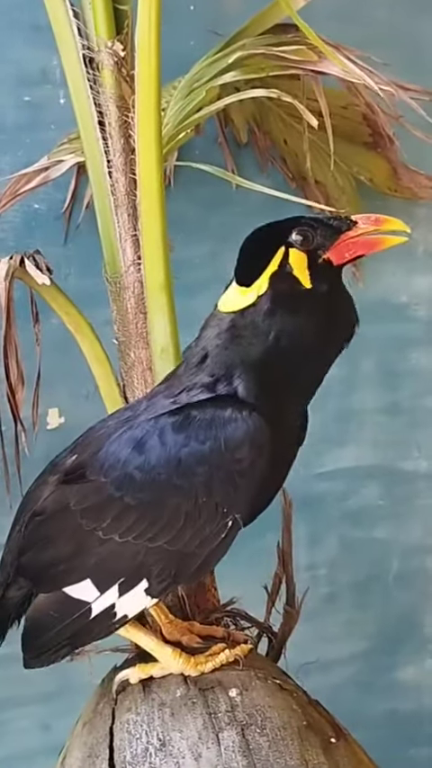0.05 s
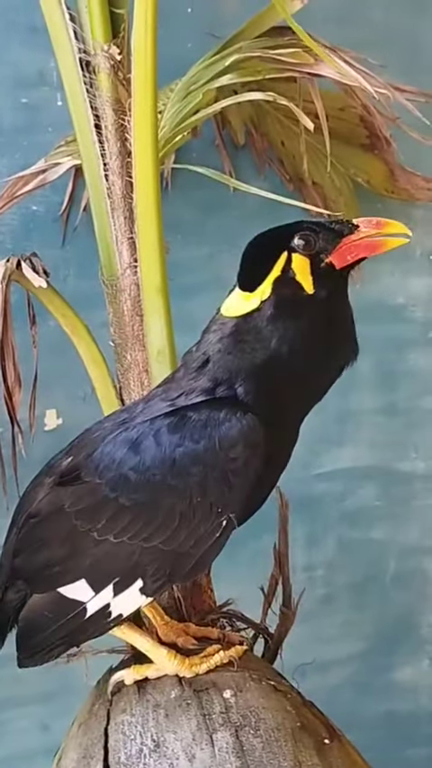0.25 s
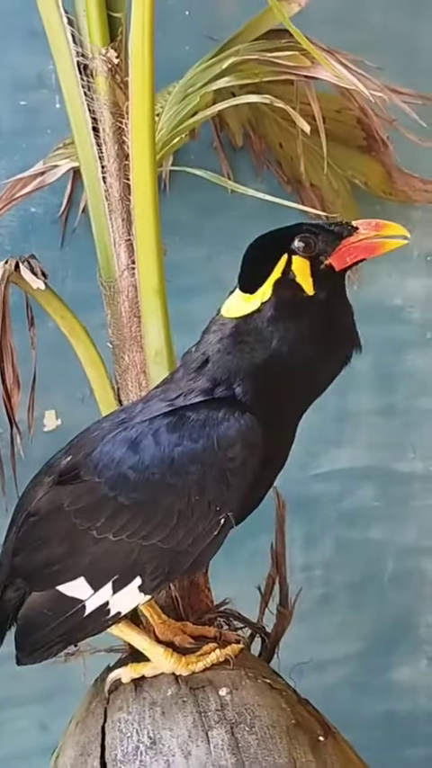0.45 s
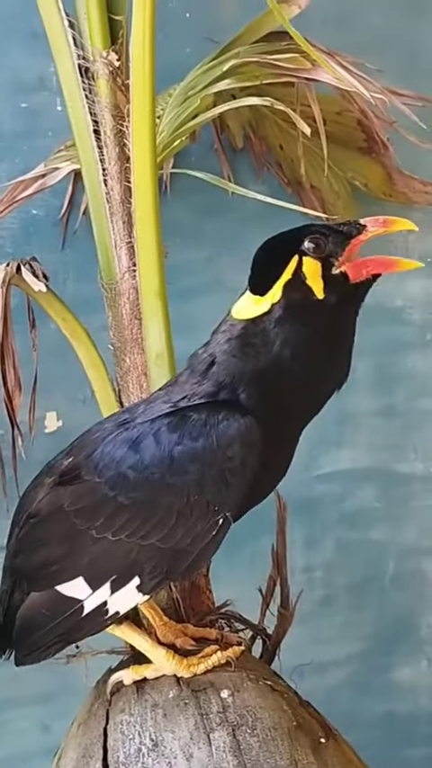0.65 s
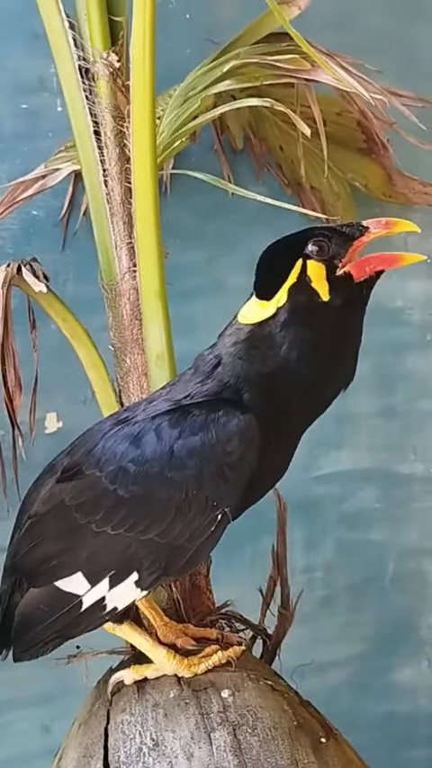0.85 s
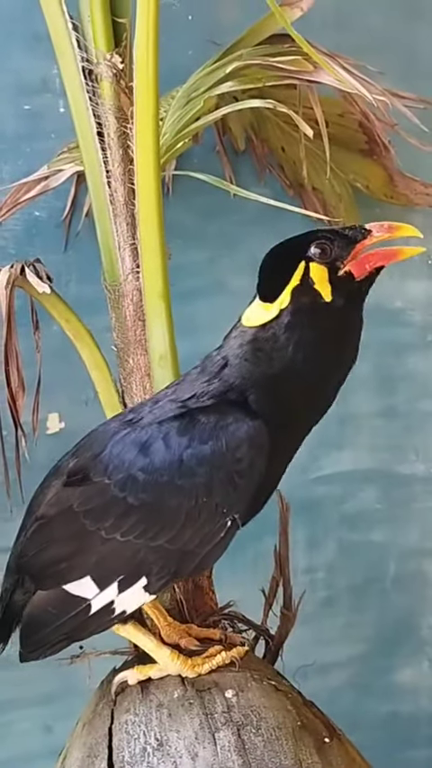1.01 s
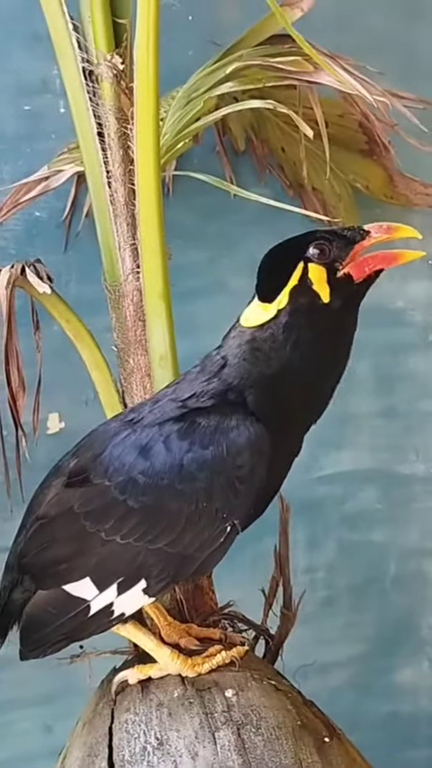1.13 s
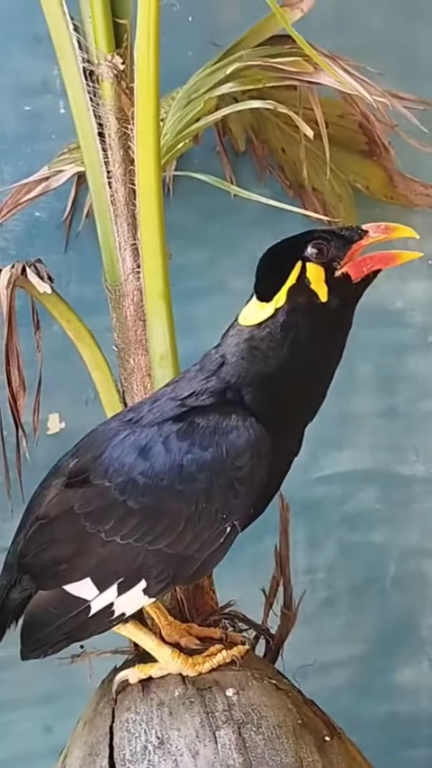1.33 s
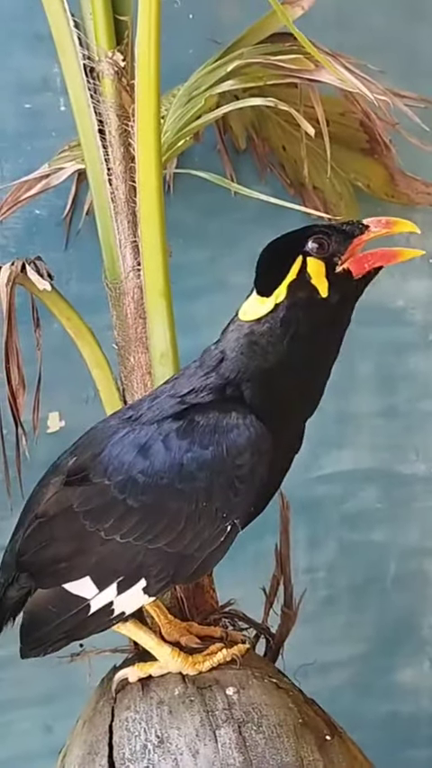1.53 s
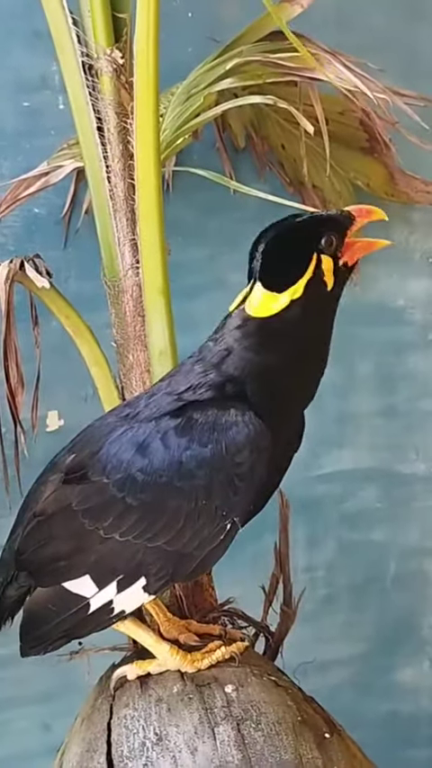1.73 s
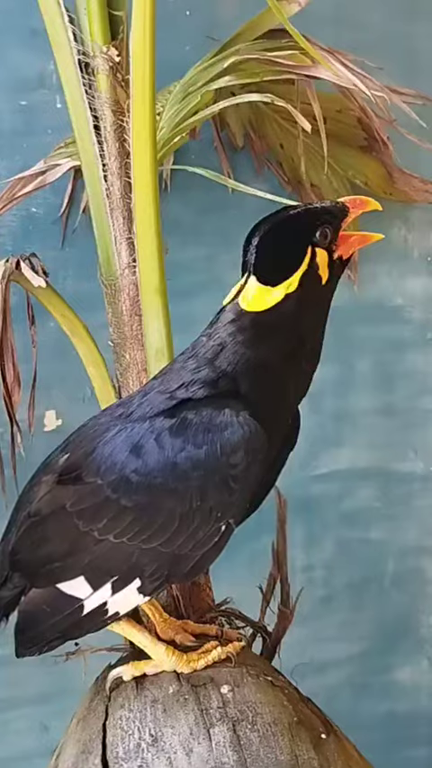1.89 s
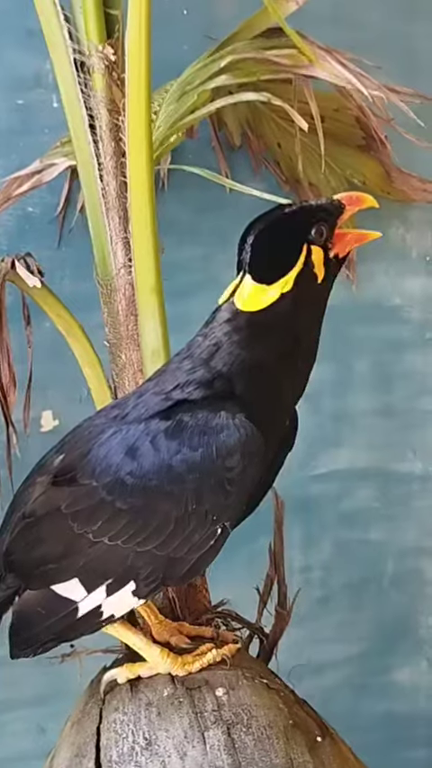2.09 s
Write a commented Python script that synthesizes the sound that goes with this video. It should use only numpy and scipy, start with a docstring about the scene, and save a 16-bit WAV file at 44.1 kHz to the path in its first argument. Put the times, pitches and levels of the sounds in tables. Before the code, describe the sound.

Bird whistles: a fast fluttering warble leaps into a piercing cry, then quieter notes in a walled yard.

```python
"""In a walled yard, a hill myna whistles close by: a warble of arched notes, then a loud high cry.
Each note is a fluttering tone with weak overtones and a thin sheen of high harmonics and hiss.
Softer calls follow in a smeared haze; the last is reedy, with a rising upper harmonic.
Echoes and a diffuse ring make the yard. Shaped noise and steady tones make a low rumble, hum and faint air."""
import sys
import numpy as np
from scipy import signal
from scipy.fft import rfft, irfft, next_fast_len
from scipy.io import wavfile
from scipy.ndimage import uniform_filter1d, minimum_filter1d, map_coordinates

SR = 44100
rng = np.random.default_rng(int(sys.argv[2]) if len(sys.argv) > 2 else 0)


def inscribe(sig):
    """Save sig as 16-bit PCM at rate SR to the path in sys.argv[1].

    A 1-D sig is mono; a 2-D sig holds one channel per row.
    Samples are clipped to [-1, 1] before scaling.
    """
    pcm = np.round(np.clip(np.atleast_2d(sig).T, -1, 1) * 32767)
    wavfile.write(sys.argv[1], SR, pcm.astype(np.int16))


N = 94815  # length in samples


def amp(db):
    """Turn decibels into a gain."""
    return 10 ** (np.asarray(db) / 20)


def unit(x):
    """Scale a sound to an rms of 1."""
    return x / np.sqrt(np.mean(x ** 2) + 1e-20)


def along(points, hz):
    """Read a curve of (Hz, value) points, with frequency on a log axis."""
    point_hz, values = np.transpose(points)
    return np.interp(np.log(hz + 1), np.log(point_hz + 1), values)


def wobble(rate, size=N):
    """Draw a smooth random curve through `rate` random points a second."""
    knots = rng.standard_normal(int(size * rate / SR) + 4)
    return map_coordinates(knots, [np.arange(size) * rate / SR])


def filtered(x, response):
    """Multiply the spectrum of a sound by a response to frequency."""
    size = next_fast_len(N + SR // 2)  # spare room, so that late sound does not wrap round
    hz = np.fft.rfftfreq(size, 1 / SR)
    return irfft(rfft(x, size) * response(hz), size)[..., :N]


# Notes of the warble, in order. Each row: start in seconds, length in seconds, start pitch in Hz,
# top pitch in Hz, end pitch in Hz, place of the top from 0 to 1, roundness of the arch (a power),
# level in dB before the yard, overtones in dB relative to the tone, sheen in dB.
WARBLE = [(-.012, 0.087, 568, 658, 590, 0.8, 2.1, -38, 0, -71.5),
          (.094, .092, 539.5, 660.4, 555, 0.53, 2.2, -30.5, 2.5, -69),
          (.202, 0.099, 598, 909.7, 780, .64, 2.2, -14, -1.5, -52),
          (.312, 0.088, 672, 901, 668, 0.5, 1.8, -18, -2, -55),
          (.412, 0.085, 642, 796.4, 680, .45, 1.2, -26, -1.5, -63),
          (.508, 0.057, 664.5, 705.6, 676, 0.8, 3.6, -20.5, -4.5, -62),
          (.597, 0.057, 647.6, 765.5, 734, .62, 1.7, -18.5, -0.5, -51.5),
          (.650, .058, 718.6, 736.5, 714, 0.32, 1.6, -22, 0, -51)]
# Brief side tones that overlap the warble, perhaps the bird's second voice.
# Each row: the same columns as the warble.
SIDE_TONES = [(0.154, 0.059, 755, 831, 766, 0.32, 2.6, -48, -22, -85.5),
              (0.281, 0.05, 1010, 1006, 911, 0.22, 2.4, -32, 7, -81.5),
              (0.657, .036, 914, 948, 946, 0.91, 2.2, -29, -14, -78)]


def warble(hiss):
    """A chain of short arched whistles with quick attacks and little flutter."""
    return whistle([*WARBLE, *SIDE_TONES], jitter=.0035, attack_s=0.0093, release_s=0.016, noise=hiss)


# The loud cry: a leap, a break and a second swell. Each row: time in seconds, pitch in Hz,
# level in dB before the yard, overtones in dB relative to the tone, sheen in dB.
CRY = [(.700, 745, -41.5, 5.5, -57), (.711, 837, -17.5, 8.5, -47.5), (.720, 1056, -15.5, 6.5, -45),
       (.730, 1224, -6.5, -6, -39.5), (.744, 1243, 1.5, -2.5, -40.5), (.757, 1311, -7.5, 8, -42),
       (.780, 1315, -4.5, 2.5, -42), (.797, 1226, -12.5, -0.5, -50), (.809, 1092, -31.5, -3.5, -68),
       (.820, 1135, -31.5, -1.5, -68.5), (.829, 1241, -3.5, -7, -56), (.847, 1308, -12, -2, -55.5),
       (.874, 1257, -9, -9.5, -57), (.900, 1182, -15.5, -11.5, -65.5), (.922, 1131, -20, -8.5, -69),
       (.945, 1100, -48, -4, -87.5)]


def cry(hiss):
    """One unbroken whistle leaps up, breaks and swells again."""
    return glide(CRY, jitter=.0065, noise=hiss)


SOFT_ATTACK_S, SOFT_RELEASE_S = 0.0081, 0.035  # also used by the haze
# Softer calls after the cry. Each row: the same columns as the warble.
SOFT_CALLS = [(1.15, 0.21, 730, 811, 696, 0.33, 1.5, -47.5, -4, -90),
              (1.418, 0.16, 620.3, 855.4, 768, 0.74, 1.61, -25, -6, -76),
              (1.576, 0.047, 759, 726, 680, 0.18, 1.8, -22, -6.5, -75),
              (1.605, 0.13, 716, 700, 626, 0.12, 1.6, -42, -6, -84),
              (1.858, 0.083, 623.6, 751, 735, 0.728, 3, -25.5, -8, -69),
              (1.942, 0.03, 713, 750, 710, 0.36, 2.2, -25, -8, -69),
              (2.002, 0.02, 785, 738, 722, 0.56, 2.9, -21.5, -6, -76)]


def soft_calls(hiss):
    """Arched whistles with slower releases and more flutter."""
    return whistle(SOFT_CALLS, jitter=0.017, attack_s=SOFT_ATTACK_S, release_s=SOFT_RELEASE_S, noise=hiss)


# The closing reedy call. Each row: time in seconds, pitch in Hz, level in dB before the yard.
REEDY = [(2.07, 499, -53.5), (2.111, 600, -45.5), (2.145, 714, -25)]
# Mix of its harmonics. Each entry: level in dB relative to the others, for harmonics 1, 2, 3 and 4.
REEDY_HARMONICS = [4, 4, -13, -26]


def reedy_call():
    """A rough rising tone whose second harmonic is as strong as its first."""
    times, pitch, level_db = np.transpose(REEDY)
    t = np.arange(N) / SR
    rough_hz = np.interp(t, times, pitch) * (1 + 0.0087 * wobble(rate=520))
    phase = 2 * np.pi * np.cumsum(rough_hz) / SR
    reed = sum(amp(db) * np.sin(k * phase) for k, db in enumerate(REEDY_HARMONICS, 1))
    return unit(reed) * amp(np.interp(t, times, level_db)) * (t > times[0])


# Rising upper harmonic of the closing call. Each row: the same columns as the cry.
RISING_HARMONIC = [(2.03, 1129, -58, -20, -100.5), (2.07, 1380, -40.5, -20, -93.5),
                   (2.105, 1672, -45, -20, -95.5), (2.13, 1850, -41.5, -22, -102),
                   (2.155, 2440, -36, -20, -94)]


def rising_harmonic(hiss):
    """The upper harmonic of the closing call climbs with a strong flutter."""
    return glide(RISING_HARMONIC, jitter=.025, noise=hiss)


# Smeared haze: overtones ringing after the cry, and blurred low echoes of soft calls.
# Each row: the same columns as the warble.
HAZE = [(.765, .2, 2437, 2397, 1987, 0.13, 1.2, -37.5, -28.5, -97),
        (.91, 0.062, 1747, 1711, 1630, 0.25, 2, -40.5, -20, -85),
        (.905, 0.093, 1151, 1225, 1132, 0.68, 1.73, -28, -17.5, -87),
        (1.36, .10, 442.5, 590, 566, .9, 0.98, -42.5, -4, -85.5),
        (1.61, 0.069, 575.5, 535.3, 479, 0.27, 1.03, -37, -13, -84),
        (1.815, 0.06, 449, 601, 589, .9, 0.94, -39.5, -19.5, -86)]


def haze(hiss):
    """Very strong pitch flutter smears each tone into a blurred band of sound."""
    return whistle(HAZE, jitter=0.0924, attack_s=SOFT_ATTACK_S, release_s=SOFT_RELEASE_S, noise=hiss)


DB_PER_OCTAVE = 22.5  # a note swells as its pitch climbs


def whistle(notes, jitter, attack_s, release_s, noise):
    """Each note follows an arch in pitch, swells as it climbs and fades at both ends."""
    t, out = np.arange(N) / SR, np.zeros((2, N))
    for start, length, start_hz, top_hz, end_hz, place, arch, db, overtones_db, sheen_db in notes:
        on = (t >= start) & (t < start + length)
        age = t[on] - start
        u = age / length  # progress through the note, 0 to 1
        place = np.clip(place, .05, .95)
        rising_drop = (top_hz - start_hz) * abs(1 - u / place) ** arch
        falling_drop = (top_hz - end_hz) * abs((u - place) / (1 - place)) ** arch
        hz = top_hz - np.where(u < place, rising_drop, falling_drop)
        fade_in = np.sin(np.pi / 2 * np.minimum(age / attack_s, 1)) ** 2
        fade_out = np.sin(np.pi / 2 * np.minimum((length - age) / release_s, 1))
        tone = fade_in * fade_out * amp(db + DB_PER_OCTAVE * np.log2(hz / top_hz))
        sheen = amp(sheen_db) * hz / top_hz * np.sqrt(abs(np.sin(np.pi * u)))
        out[:, on] += voice(hz, jitter, tone, amp(overtones_db), sheen, noise[:, on])
    return out


def glide(rows, jitter, noise):
    """One unbroken tone follows its pitch and level curves."""
    times, *columns = np.transpose(rows)
    t, out = np.arange(N) / SR, np.zeros((2, N))
    on = (t >= times[0]) & (t < times[-1])
    hz, db, overtones_db, sheen_db = [np.interp(t[on], times, column) for column in columns]
    out[:, on] = voice(hz, jitter, amp(db), amp(overtones_db), amp(sheen_db), noise[:, on])
    return out


# Basic strength of the overtones. Each entry: level in dB, for harmonics 2, 3, 4 and 5.
OVERTONE_DB = [-28.5, -36.5, -49, -54.5]
# Colour that the throat adds to the overtones. Each row: frequency in Hz, gain in dB.
THROAT = [(1200, 1.5), (1550, 4.5), (1800, -1), (2250, 7), (2650, 2), (3200, 0), (3600, 1.5), (4000, 0.5),
          (5300, 4), (6800, -4)]
# Colour of the high harmonics on low notes, beak nearly shut. Each row: frequency in Hz, gain in dB.
SHEEN_SHUT = [(4500, -38.5), (6500, -12.5), (8500, -27.5), (9400, 2), (10200, -20.5), (11100, -26.5),
              (12600, -10.5), (13900, -5.5), (14600, -3), (15400, 2), (17000, -51.5)]
# Colour of the high harmonics on high notes, beak open. Each row: frequency in Hz, gain in dB.
SHEEN_OPEN = [(4500, -41), (6300, -15), (7000, -25.5), (7800, -12), (8600, -31), (9650, 10.5),
              (10400, -4.5), (11000, -18), (11700, -9), (12400, -12), (13300, -8.5), (15400, -12.5),
              (17000, -49)]
SHUT_HZ, OPEN_HZ = 796, 910  # pitches between which the beak opens
SHIMMER_DB, OVERTONE_FLICKER_DB, HISS_FLICKER_DB = 2, 4, 5  # size of the random level changes
OVERTONE_BLUR = .075  # random phase drift in radians, multiplied by the harmonic number
FIRST_HIGH, HARMONIC_END = 6, 24  # the sheen holds harmonics 6 to 23


def voice(hz, jitter, tone, overtones, sheen, noise):
    """A fluttering tone, uneven overtones, and high harmonics and hiss; the sheen shifts as the beak opens."""
    def flutter(rate):
        return wobble(rate, size=len(hz))

    phase = 2 * np.pi * np.cumsum(hz * (1 + jitter * flutter(rate=720))) / SR
    blurred = phase + OVERTONE_BLUR * flutter(rate=410)

    def harmonic(k, db):
        level = amp(db + OVERTONE_FLICKER_DB * flutter(rate=80))
        return level * np.sin(k * blurred + rng.uniform(0, 2 * np.pi))

    def sheen_colour(k):
        return (1 - opening) * along(SHEEN_SHUT, k * hz) + opening * along(SHEEN_OPEN, k * hz)

    opening = np.clip((hz - SHUT_HZ) / (OPEN_HZ - SHUT_HZ), 0, 1)
    low = sum(harmonic(k, db + along(THROAT, k * hz)) for k, db in enumerate(OVERTONE_DB, 2))
    high = sum(harmonic(k, sheen_colour(k)) for k in range(FIRST_HIGH, HARMONIC_END))
    pulse = 1 + .5 * np.sin(phase)  # the hiss pulses in step with the tone
    hiss = noise * amp(HISS_FLICKER_DB * flutter(rate=83)) * pulse
    shimmer = amp(SHIMMER_DB * flutter(rate=200))
    whistled = np.sqrt(2) * shimmer * (np.sin(phase) + overtones * low)
    return tone * whistled + sheen * (high + hiss)


# Colour of the hiss on the warble and cry. Each row: frequency in Hz, relative level in dB.
HISS = [(500, -30), (2000, 8), (2800, 1), (5000, -3.5), (7000, -12), (8600, -35.5), (9200, -4.5),
        (9600, 1.5), (10200, -12.5), (11100, -22.5), (12700, -5.5), (14500, -11), (16000, -10.5)]
# Colour of the hiss on the softer sounds. Each row: frequency in Hz, relative level in dB.
SOFT_HISS = [(500, -9), (2000, -1.5), (5000, -7), (8600, -23), (9700, -0.5), (11100, -9.5), (12700, 10),
             (14000, 0), (16000, -8.5)]


def breath():
    """Shaped noise for the breathy hiss: one for the warble and cry, one for the softer sounds."""
    return amp(-1.5) * rush(HISS), amp(4.5) * rush(SOFT_HISS)  # dB relative to the sheen


# Faint dry ticks. Each row: time in seconds, starting level in dB.
TICKS = [(1.113, -58.5), (2.026, -59.5)]
# Colour of the ticks. Each row: frequency in Hz, relative level in dB.
TICK_COLOUR = [(1000, -15), (5000, 0.5), (8500, -30), (13500, 3.5), (15500, -13)]
TICK_T60_S = .05  # time to fall by 60 dB


def ticks():
    """Tiny dry clicks, perhaps of the beak: noise that starts at once and dies fast."""
    t = np.arange(N) / SR
    decay = sum((t >= s) * amp(db - 60 * abs(t - s) / TICK_T60_S) for s, db in TICKS)
    return rush(TICK_COLOUR) * decay


RIGHT_LAG_S = 0.00017  # the bird sits a little to the left
# Distinct echoes off the walls. Each row: left delay in seconds, right delay in seconds, gain in dB.
WALLS = [(.0032, 0.0046, -23), (.0135, 0.019, -15), (.029, 0.038, -19.5), (.046, .043, -13)]


def walls(x):
    """The direct sound, later at the right ear, and a few distinct echoes."""
    def delay(hz, left_s, right_s):
        return np.exp(-2j * np.pi * hz * np.array([[left_s], [right_s]]))

    def response(hz):
        echoes = sum(amp(db) * delay(hz, left_s, right_s) for left_s, right_s, db in WALLS)
        return delay(hz, 0, RIGHT_LAG_S) + echoes

    return filtered(x, response)


# How long the yard rings. Each row: frequency in Hz, time to fall by 60 dB in seconds.
YARD_T60 = [(300, 0.75), (500, 0.26), (720, 0.21), (860, 0.46), (1300, 0.31), (2200, 0.31), (4000, 0.39),
            (9000, 0.15), (15000, .3)]
YARD_DELAY_S, YARD_ONSET_S = 0.013, 0.0036


def yard(x):
    """Diffuse ring of the yard: noise that builds up late and decays at its own pace in each band."""
    hz, t, bands = signal.stft(rng.standard_normal((2, SR)), SR, nperseg=256)
    age = np.maximum(t - YARD_DELAY_S, 0)
    decay = amp(-60 * age / along(YARD_T60, hz)[:, None])
    tail = signal.istft(bands * decay * (1 - np.exp(-age / YARD_ONSET_S)), SR, nperseg=256)[1]
    tail /= np.sqrt(np.mean(abs(rfft(tail, SR)[:, 500:1500]) ** 2))  # rms gain of 1 from 500 to 1500 Hz
    return signal.fftconvolve(x, tail, axes=1)[:, :N]


# Low resonances between the walls. Each row: centre in Hz, width in Hz, gain in dB of the added ring.
YARD_MODES = [(477.5, 36, 6.5), (536, 4, 7.5)]


def standing_waves(x):
    """Low notes set the air between the walls ringing."""
    def response(hz):
        return 1 + sum(amp(db) * 1j * hz * width / (centre ** 2 - hz ** 2 + 1j * hz * width)
                       for centre, width, db in YARD_MODES)

    return filtered(x, response)


# Balance between the ears. Each row: frequency in Hz, lift of the left and equal cut of the right in dB.
PAN = [(600, 0), (1200, -0.94), (4500, -1), (9700, -1), (12500, 3.5)]


def ear_balance(x):
    """Each frequency leans to the left or right by its own amount."""
    return filtered(x, lambda hz: amp(along(PAN, hz) * np.array([[1], [-1]])))


# Likeness of the two ears in the hiss, ticks, rumble and air.
# Each row: frequency in Hz, likeness from 0 to 1.
ALIKE = [(50, 1), (150, 0.9), (500, .75), (1500, 0.17), (5000, 0.11)]


def rush(spectrum):
    """Coloured stereo noise of rms 1, nearly mono in the bass."""
    def response(hz):
        turn = np.arccos(np.clip(along(ALIKE, hz), -1, 1)) / 2
        return amp(along(spectrum, hz)) * [np.cos(turn), np.sin(turn)]

    mid, side = filtered(rng.standard_normal((2, N)), response)
    return unit(np.array([mid + side, mid - side]))


# Colour of the low rumble. Each row: frequency in Hz, relative level in dB.
RUMBLE = [(12, -31.5), (20, -14), (27, -4), (54, 1.5), (80, 3.5), (98, -4), (129, -13), (203, -11),
          (319, -21), (371, -26), (400, -18.5), (520, -40.5), (880, -120)]
# Colour of the faint outdoor air. Each row: frequency in Hz, relative level in dB.
AIR = [(180, -30), (300, -5), (484, -9), (700, -10.5), (1260, -10.5), (1640, -15.5), (2800, -18.5),
       (5000, -29), (7000, -35.5), (8500, -45.5), (9700, -39), (11000, -51.5), (13000, -38), (15500, -46)]
# Steady machine tones. Each row: frequency in Hz, rms level in dB.
HUM = [(48, -44), (85, -44.5), (217, -58.5), (487, -60.5)]


def background():
    """Low rumble and faint air from shaped noise, with a hum whose phase drifts slightly."""
    t = np.arange(N) / SR
    hum = sum(amp(db) * np.sqrt(2) * np.sin(2 * np.pi * hz * t + 0.42 * wobble(rate=4.3)) for hz, db in HUM)
    return amp(-36) * rush(RUMBLE) + hum + amp(-49) * rush(AIR)


def scene():
    """Near warble and cry, then softer calls and haze in the yard, over the background."""
    hiss, soft_hiss = breath()
    chain = warble(hiss)
    loud = cry(hiss)
    soft = soft_calls(soft_hiss) + reedy_call() + rising_harmonic(soft_hiss)
    smeared = standing_waves(haze(soft_hiss))
    direct = walls(chain + loud + amp(-2.5) * soft + amp(-3) * smeared)
    near_ring = yard(amp(-4) * chain + amp(-5.5) * loud)
    soft_ring = yard(amp(-4) * soft + amp(-0.5) * smeared)
    return ear_balance(direct + near_ring + soft_ring) + ticks() + background()


CEILING_DB, LIMITER_HOLD_S, LIMITER_RELEASE_S = -1, 0.087, 0.083


def limiter(x):
    """Loud peaks pull the gain down at once; it holds, then recovers."""
    need = np.minimum(1, amp(CEILING_DB) / (abs(x).max(axis=0) + 1e-9))
    half = int(LIMITER_HOLD_S * SR / 2)
    cut = 1 - minimum_filter1d(need, 2 * half + 1, origin=half)  # looks back, so each cut is held
    fade = np.exp(-np.arange(N) / SR / LIMITER_RELEASE_S)
    recovering_cut = np.maximum.accumulate(cut / fade) * fade
    return x * uniform_filter1d(1 - recovering_cut, size=220)  # smoothed over 5 ms


TOP_HZ = 15700


def record(dry):
    """The recorder limits the peaks and keeps nothing above its band limit; the last moment eases out."""
    ease = np.minimum(np.arange(N)[::-1] / (.006 * SR), 1)  # the last 6 ms
    return filtered(limiter(dry) * ease, lambda hz: hz < TOP_HZ)


dry = scene()
out = record(dry)
inscribe(out)
```